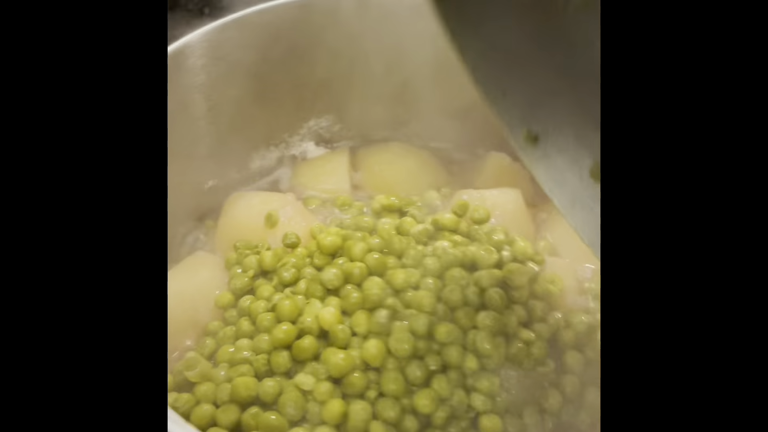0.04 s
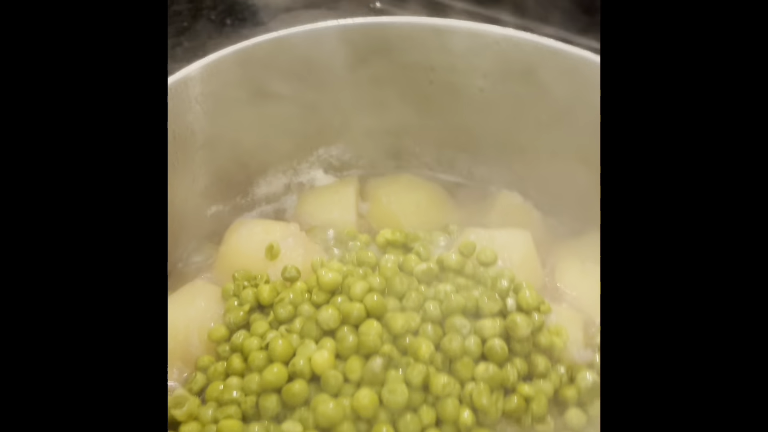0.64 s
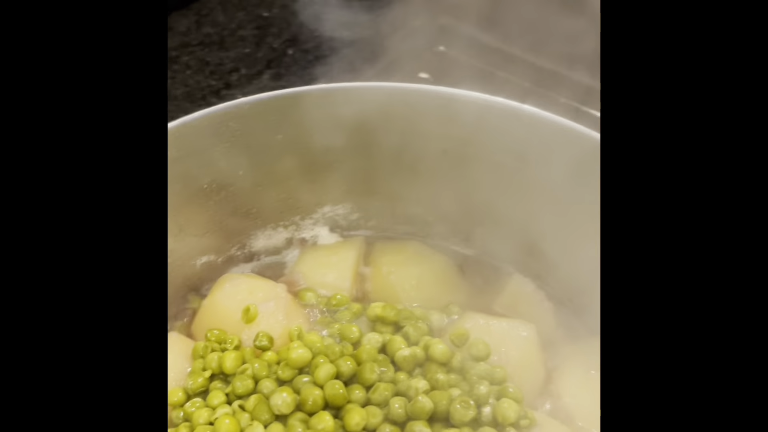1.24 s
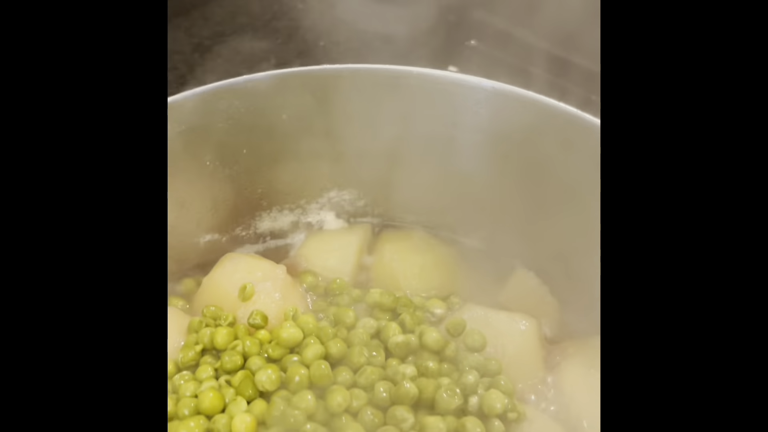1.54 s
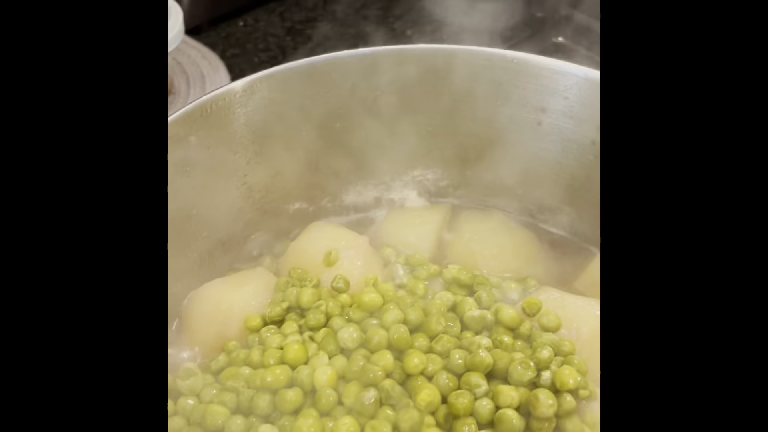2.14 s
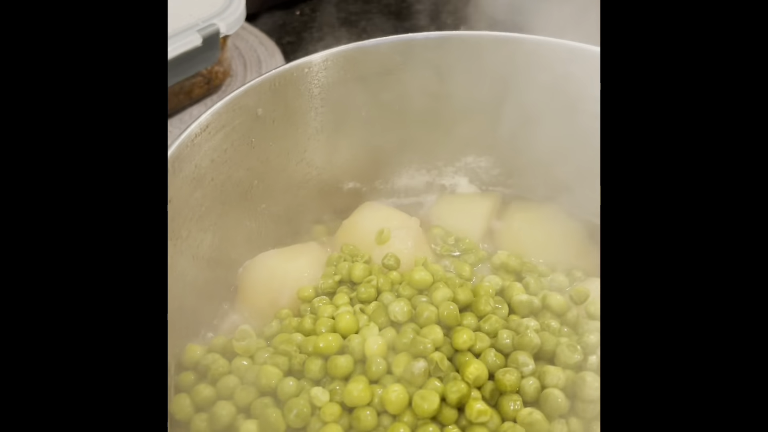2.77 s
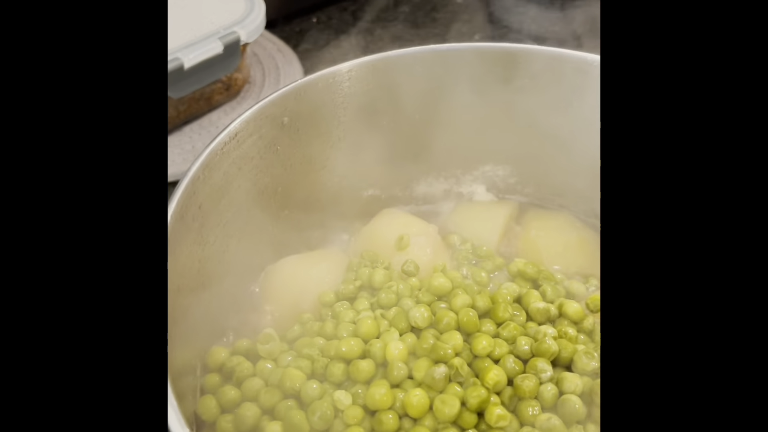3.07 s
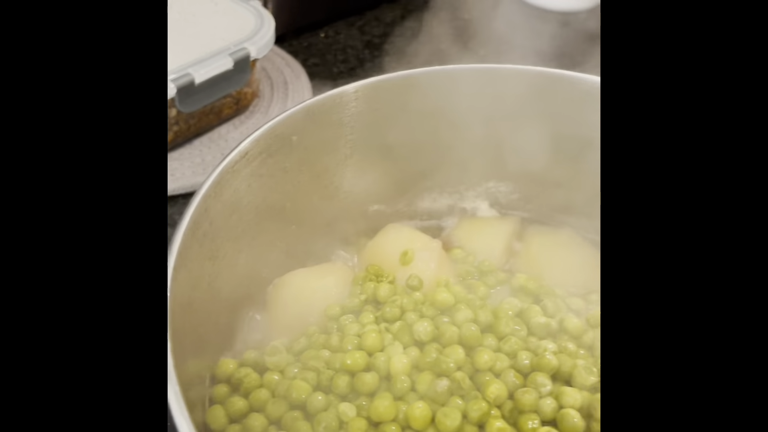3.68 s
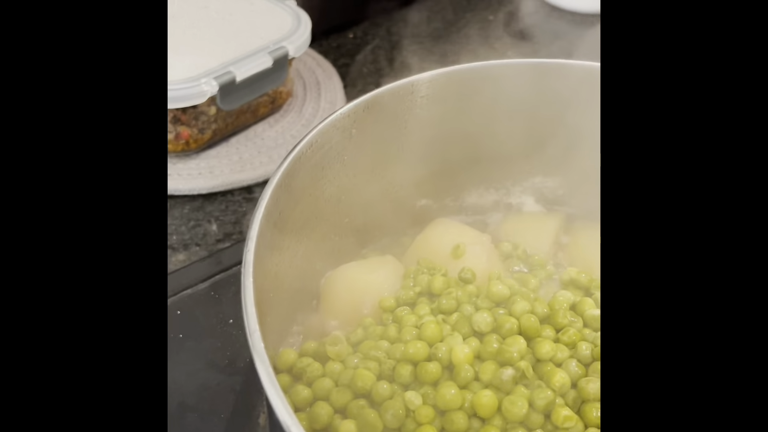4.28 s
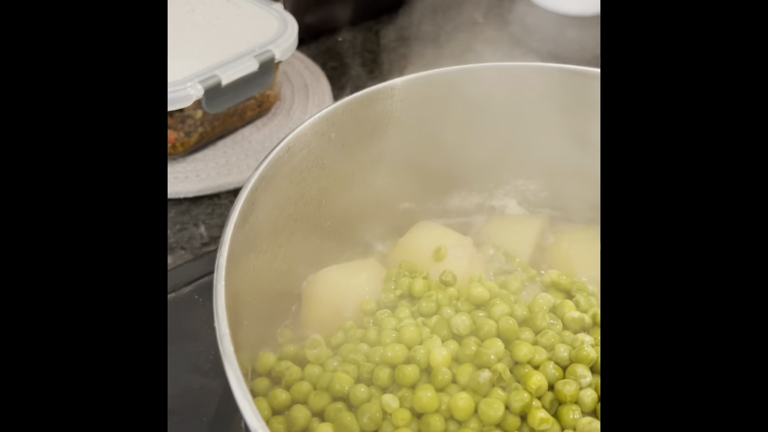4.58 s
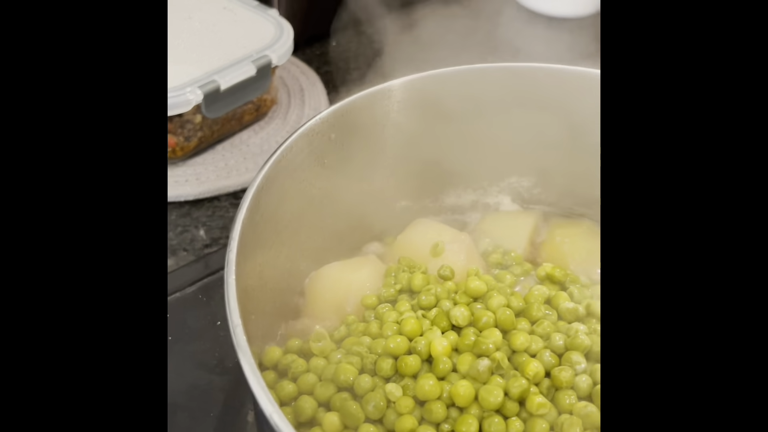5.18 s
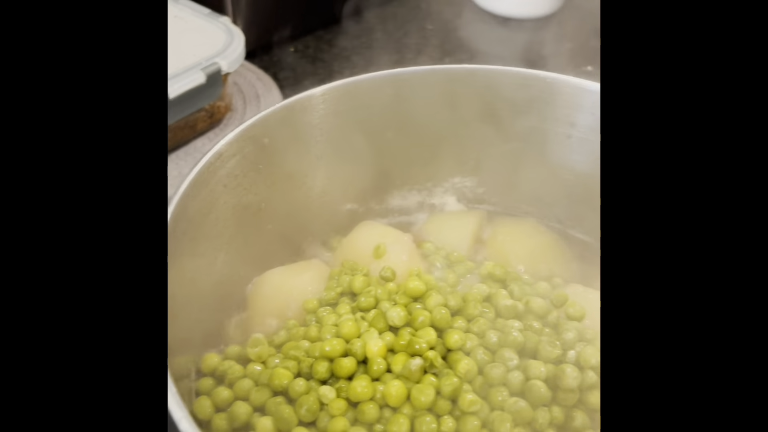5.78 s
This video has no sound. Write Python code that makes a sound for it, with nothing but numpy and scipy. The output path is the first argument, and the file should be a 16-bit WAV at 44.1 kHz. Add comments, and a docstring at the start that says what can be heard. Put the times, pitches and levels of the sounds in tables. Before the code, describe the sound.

Water boils throughout in a steel pot of peas and potatoes, heard very close in a kitchen with little echo. The steady layer is a fine, crackling fizz with small bubbles over a low, uneven rumble, and the fizz grows slightly stronger after about 1.4 seconds. Droplets tick sharply on the hot metal here and there. Steam pockets burst through the food as short, hollow, falling plops with small splashes, first in the opening half second and again from 1 to 1.4 seconds. A sharper bubble pop follows at about 1.5 seconds. From 2 to 3.4 seconds there are mostly light blips and high ticks. The plops return more often from 3.7 to 4.9 seconds. Around 5.4 seconds a few more come with a faint knock of food against the steel wall, and the boiling continues to the end, just before 6 seconds.

```python
"""Peas and potatoes on the boil

A little water boils in a steel pot, close to a pair of microphone ports. Over a low rumble, tiny bubbles
fizz and tick on the hot metal and small ones blip between the peas. Now and then a pocket of steam bursts
through the food with a falling plop and a splash. The pot's hollow, its wall and the kitchen answer."""
import sys
import numpy as np
from scipy import signal
from scipy.fft import rfft, irfft, next_fast_len
from scipy.io import wavfile
from scipy.ndimage import map_coordinates

SR = 44100
rng = np.random.default_rng(int(sys.argv[2]) if len(sys.argv) > 2 else 0)


def transcribe(u):
    """Save the signal u as a 16-bit wav file named by the first command-line argument.

    u: samples, shape (n,) or (channels, n), limited to [-1, 1]; the rate is SR.
    q: integer samples, one column per channel.
    """
    v = np.clip(np.atleast_2d(u).T, -1, 1)
    q = np.round(v * 32767).astype(np.int16)
    wavfile.write(sys.argv[1], SR, q)


N = 256662

# EQ curves of the boiling bed: (frequency [Hz], relative level [dB])
RUMBLE_EQ = [(20, -31), (35, -11), (52, -1.5), (75, 1.5), (100, -5), (135, 3), (180, -3), (260, 1),
             (500, -9), (1200, -49)]
DIFFUSE_EQ = [(100, -18), (200, -9), (500, -2.5), (1100, -1), (1700, -13), (2700, -2), (4300, 1),
              (6000, -1), (9000, -22), (11000, -0.5), (13000, -13), (16000, -50)]
SIMMER_EQ = [(100, -32), (250, 3.5), (520, 3), (780, -3.5), (1100, -1.5), (1500, -3.5), (3000, -6.5),
             (4500, -10), (8000, -37)]
FIZZ_EQ = [(1000, -30), (2500, -12), (4300, -10.5), (5800, -4), (7000, -3.5), (9000, -3.5), (10900, 1.5),
           (12000, -6), (14000, -28.5), (16000, -58)]
# fader rides of the bed: (time [s], relative level [dB])
SIMMER_RIDE = [(0, -40), (1, -39), (2.4, -39), (2.9, -39.5), (3.02, -37.5), (3.15, -41), (3.4, -39.5),
               (3.9, -41), (5.82, -38)]
FIZZ_RIDE = [(0, -34.5), (.25, -39.5), (.48, -34.5), (1.1, -34), (1.4, -32.5), (3.8, -32.5), (5.82, -31.5)]

# food bumping the wall: (time [s], relative level [dB], height on the wall [0-1])
KNOCK_CUES = [(5.43, -23, 1), (5.4527, -14.5, 0), (5.472, -22, .5)]
# the steel's ring: (frequency [Hz], gain struck low [dB], gain struck high [dB], t60 [s])
STEEL_MODES = [(774, -3.5, -16, 0.029), (1853, -3.5, -18, .027), (3375, -8.5, 0, 0.032),
               (5430, -1, -15, 0.021), (6600, -21, -9, .025)]
# droplets snapping on hot steel: (time [s], relative level [dB], pitch [Hz])
TICK_CUES = [(0.1545, -4, 7300), (0.165, 1, 11200), (0.4223, -7.5, 12200), (0.6119, -9, 11000),
             (0.8955, -9.5, 12300), (0.9133, -10, 11500), (1.3193, -11, 7200), (1.3772, -4.5, 10800),
             (1.4365, -9, 7600), (1.501, -18, 7040), (1.5805, -15, 6600), (1.7074, -10, 7100),
             (1.743, -6.5, 11000), (1.9828, -3, 11600), (2.1035, -4, 11300), (2.1664, -5, 10900),
             (2.3031, -2.5, 6700), (2.315, -6, 10900), (2.4243, -1.5, 11600), (2.4851, -9, 10500),
             (2.6822, -4, 6060), (2.779, -3.5, 6700), (3.0509, -1, 6900), (3.1591, -10, 11800),
             (3.1915, -6, 5740), (3.3522, -3.5, 10800), (3.8879, -1, 10900), (4.112, -9, 10500),
             (5.416, -11, 6470), (5.6973, -3, 6900), (5.7846, -7, 10900)]
# featured bubbles, dry pops to ringing blips: (time [s], relative level [dB], pitch [Hz], t60 [cycles])
BLIP_CUES = [(0.1545, -8, 1562, 61), (0.2364, -22, 1580, 38), (0.263, -26, 1730, 45),
             (0.6075, -28.5, 1130, 44), (0.755, -27, 1550, 37), (0.994, -31, 1180, 44),
             (1.233, -29, 1030, 44), (1.5374, -4, 1730, 6.4), (1.5428, -6, 3600, 11),
             (1.877, -28.5, 1076, 37), (2.124, -26, 1640, 20), (2.153, -26, 1900, 16),
             (2.343, -24, 1700, 12), (2.3573, -20, 2720, 19), (2.413, -26, 1700, 16),
             (2.4238, -22, 2600, 7.3), (2.4545, -24, 1100, 14), (2.459, -29, 2000, 14),
             (2.6826, -18.5, 3060, 20), (2.7762, -15, 3170, 19), (3.036, -17.5, 2300, 9),
             (3.0508, -19, 2800, 8.8), (3.062, -25, 1090, 12), (3.3485, -21, 3230, 11),
             (3.362, -24, 1070, 18), (3.364, -24, 2600, 20), (5.359, -27, 1050, 44),
             (5.6979, -23, 3240, 22)]
# bursting steam pockets: (time [s], relative pocket level [dB], depth under the food [0-1],
# landing pitch [Hz], fall time constant [s], thump delay [s], relative water level [dB],
# share of mist [0-1], splash t60 [s])
PLOP_CUES = [(0.001, -25, 1, 144, 0.0024, 0, -57, 0.2, .027),
             (0.138, -27, 0.8, 154, 0.0028, .003, -16, 0.54, .019),
             (0.1544, -37, 0.87, 410, 0.0015, 0, -21.5, 0.4, 0.028),
             (0.1646, -19, 0.72, 200, 0.0032, .005, -26, 0.7, 0.014),
             (0.267, -27.5, 0.8, 121, 0.00265, 0, -58, .6, .03),
             (0.467, -28.5, 0.7, 131, 0.0027, 0.00035, -54, .9, .03),
             (1.049, -25.5, 0.76, 190, .003, 0.0051, -26, 0.31, 0.044),
             (1.127, -18, 0.33, 284, .0026, 0.0071, -18.5, 0.17, 0.024),
             (1.156, -32, .2, 425, 0.0022, 0.00086, -39, .2, .025),
             (1.334, -15, 0.3, 331.6, .003, 0.014, -21.5, 0.23, 0.024),
             (1.391, -30, 0.34, 444, .001, 0.0075, -42, .3, .02),
             (1.543, -40, 0, 290, 0.0043, 0.021, -26, 0.53, 0.0099),
             (1.583, -32.5, .15, 284, 0.0051, 0.0042, -44, 0.4, .02),
             (2.992, -42, 0.04, 380, .004, 0.0118, -41, 0.26, 0.047),
             (3.036, -50, 0, 406, .0026, 0.014, -29, 0.26, 0.019),
             (3.705, -31, .13, 393, 0.0041, 0.015, -28, 0.5, 0.017),
             (3.721, -30, 0.16, 330, 0.0026, 0.019, -38, .4, .02),
             (3.735, -31, 0.4, 260, 0.0032, 0, -34, 0.8, 0.025),
             (3.7512, -19.5, 0.05, 324, 0.0021, 0.025, -29, 0.14, 0.026),
             (3.982, -25.5, 0.15, 292, .003, 0.0051, -24.5, 0.78, 0.04),
             (3.999, -26.5, 0.13, 263, 0.0029, 0.0016, -35, 0.3, .02),
             (4.0257, -19.5, 0.21, 272, 0.00193, 0.0059, -16.5, 0.3, 0.013),
             (4.239, -23.5, 0.35, 256, .0026, 0.027, -21, 0.81, 0.034),
             (4.294, -26, 0, 345, 0.0027, 0.015, -25, .57, 0.039),
             (4.551, -24.5, 0.44, 350, 0.0044, 0.021, -20, 0.7, 0.024),
             (4.632, -21, .6, 136, .0045, 0.0096, -28.5, 0.87, 0.021),
             (4.7395, -28, 0.23, 405, .0045, 0.034, -23, 0.86, 0.028),
             (4.868, -25, .05, 460, 0.0032, 0.015, -23, 0.79, 0.03),
             (4.9193, -23, 0.4, 231, 0.0021, 0, -22.5, 0.17, 0.017),
             (5.4249, -31, .2, 690, 0.00096, 0.017, -30, .3, 0.014),
             (5.429, -28, 0.5, 302, 0.0031, 0.0027, -24, 0.84, .045),
             (5.4525, -24.5, 0.46, 443, 0.0027, 0.015, -21.5, 0.44, 0.019)]
# EQ curves of the noise in ticks, blips and plops: (frequency [Hz], relative level [dB])
SPUTTER_EQ = [(1000, -20), (3000, -6), (6000, 3), (9000, 12), (11000, 12.5), (12500, -0.5), (14000, -34),
              (16000, -32)]
GURGLE_EQ = [(70, -14.5), (130, 0.5), (250, 6.5), (480, 7), (750, 2), (1100, -4), (2500, -33)]
PUSH_EQ = [(20, -42), (45, 0), (80, 2), (120, -5), (250, -30), (800, -47)]
SPLASH_EQ = [(150, -19), (450, -1), (1000, -1), (1500, 0.5), (2400, -1.5), (3400, -2), (4500, -10),
             (8000, -7), (14000, -45)]
SPRAY_EQ = [(1000, -48), (2500, -9), (4300, -12.5), (5800, -3.5), (8000, -3), (9000, 1), (10500, 4.5),
            (11500, 1.5), (12200, -6.5), (14000, -21), (16000, -45)]
SPATTER_EQ = [(300, 2), (900, -2), (2000, 0.5), (3700, -3.5), (5500, -4.5), (11000, 0), (14000, -24)]

# resonances of the pot: its air hollow up to about 1.2 kHz, its steel wall above: (frequency [Hz], width [Hz],
# gain [dB])
POT_MODES = [(139.7, 16, 9.5), (259, 21, 10), (332.4, 14.5, 6.5), (383.8, 18.4, 8), (491, 70, 7.5),
             (766, 14, 5), (855, 60, 4.5), (992, 57, 7.5), (1140, 230, 3), (1530, 32, -1),
             (2180, 63, 6.5), (3194, 68, 5.5)]
# reverb returns of the pot wall and the kitchen: (frequency [Hz], gain [dB])
WALL_EQ = [(100, -30), (400, -24.5), (850, -15.5), (1700, -16), (2700, -5.5), (4300, 2.5), (6000, -6.5),
           (9000, -43), (13000, -9)]
KITCHEN_EQ = [(60, -50), (200, -31), (500, -17), (3000, -9.5), (8000, -41)]
# the kitchen's decay: (frequency [Hz], t60 [s])
KITCHEN_DECAY = [(120, 0.24), (1000, 0.023), (4000, 0.13), (12000, 0.056)]
# stereo phase of the direct sound: (frequency [Hz], left's lead over right [rad])
STEREO_PHASE = [(100, 0), (400, -.4), (800, -1.1), (1300, -.6), (1800, 0), (2800, 1.3), (3900, .4),
                (4850, 3.2), (5700, 6.1), (6200, 6.4), (9100, 9.4), (12200, 12.5), (13700, 12.7),
                (15500, 15.7)]
# stereo balance: (frequency [Hz], left minus right [dB])
STEREO_TILT = [(60, 0), (200, -2), (400, -3.5), (750, -5.5), (1300, -2.5), (2400, 0.5), (5000, -0.5)]


def amp(db):
    """Decibels to gain."""
    return 10 ** (np.asarray(db) / 20)


def unit(x):
    """x at rms 1."""
    return x / np.sqrt(np.mean(x ** 2) + 1e-20)


def along(points, hz):
    """(Hz, value) points read on a log axis."""
    f, v = np.transpose(points)
    return np.interp(np.log(hz + 1), np.log(f), v)


def wobble(rate):
    """A smooth random curve with rate knots a second."""
    return map_coordinates(rng.standard_normal(int(N * rate / SR) + 4), [np.arange(N) * rate / SR])


def filtered(x, response):
    """x through a complex frequency response."""
    size = next_fast_len(x.shape[-1] + SR // 2)
    return irfft(rfft(x, size) * response(np.fft.rfftfreq(size, 1 / SR)), size)[..., :x.shape[-1]]


def coloured(x, eq, size=4096):
    """x through a minimum-phase filter of energy 1, shaped like the EQ curve."""
    cepstrum = irfft(np.log(amp(along(eq, np.fft.rfftfreq(size, 1 / SR)))))
    cepstrum[1:size // 2] *= 2
    cepstrum[size // 2 + 1:] = 0
    kernel = irfft(np.exp(rfft(cepstrum)))
    return signal.fftconvolve(x, kernel / np.linalg.norm(kernel))[:len(x)]


def envelope(t, rise, t60):
    """An attack and decay of height 1; times in seconds."""
    shape = (1 - np.exp(-t / rise)) * np.exp(-np.log(1000) * t / t60)
    return shape / shape.max(axis=-1, keepdims=True)


def add(track, s, sound):
    """Mix a sound into a track at time s."""
    start = max(round(s * SR), 0)
    track[start:start + len(sound)] += sound[:len(track) - start]


def random_cues(count):
    """Rows of a random time in seconds and two normal deviates."""
    return np.column_stack([rng.random(count) * N / SR, rng.standard_normal((count, 2))])


def crackle(rate, spread_db):
    """Random impulses of rms 1, most small and a few large."""
    chance, size = rng.random(N), np.clip(rng.standard_normal(N), -2, 2.6)
    return unit((chance < rate / SR) * amp(spread_db * size) * rng.choice([-1, 1], N))


def bubbles(low_hz, high_hz, cycles, spread_db, count):
    """A stream of small bubbles, each a short damped sine; rms 1."""
    when, pitch, life, size = rng.random((count, 4)).T[:, :, None]
    t = np.arange(SR // 40) / SR
    hz = low_hz * (high_hz / low_hz) ** pitch
    ring = np.sin(2 * np.pi * hz * t) * envelope(t, .5 / hz, cycles * (.5 + life) / hz)
    gain = amp(spread_db * np.minimum(-np.log(size), 4)) * hz / low_hz
    slots = (when * N).astype(int) + np.arange(len(t))
    return unit(np.bincount(slots.ravel(), (gain * ring).ravel(), N)[:N])


def reflections(x, t60s, eq, delay_s, patterns):
    """Diffuse echoes at each port; one pattern fades into the next as steam and microphone drift."""
    out, step = np.zeros((2, N)), N // patterns
    for centre in range(0, N, step):
        hz, t, noise = signal.stft(rng.standard_normal((2, SR // 3)), SR, nperseg=128)
        decay = np.exp(-np.log(1000) * t / along(t60s, hz)[:, None])
        tails = signal.istft(noise * decay, SR, nperseg=128)[1]
        span = np.arange(max(centre - step, 0), min(centre + step, N))
        piece = x[span] * np.cos(np.pi / 2 * (span - centre) / step)
        for port, tail in zip(out, tails):
            add(port, span[0] / SR + delay_s, signal.fftconvolve(piece, tail / np.linalg.norm(tail)))
    return filtered(out, lambda hz: amp(along(eq, hz)))


def pot_resonance(x):
    """The air in the pot resonates and lifts a few low notes; the steel wall colours a few higher ones."""
    return filtered(x, lambda f: 1 + sum(
        (amp(db) - 1) * 1j * f * width / (hz * hz - f * f + 1j * f * width)
        for hz, width, db in POT_MODES))


def churn():
    """The water rolls with a low, uneven rumble."""
    return amp(-45.5 + 2.5 * wobble(11)) * unit(coloured(rng.standard_normal(N), RUMBLE_EQ))


def diffuse_boil(level_db):
    """Boiling from all round the pot reaches each port off the walls as its own fine crackle."""
    ports = [unit(coloured(crackle(rate=5000, spread_db=5.5), DIFFUSE_EQ)) for port in range(2)]
    return amp(level_db - 10) * np.array(ports)


def simmer(level_db):
    """Water bubbles between the peas: near bubbles ring over a wash of far ones."""
    stream = bubbles(low_hz=405, high_hz=4320, cycles=11.6, spread_db=2.5, count=4200)
    wash = rng.standard_normal(N)
    flutter = amp(1.5 * wobble(18))
    return amp(level_db - 0.45) * unit(coloured((stream + wash) * flutter, SIMMER_EQ))


def fizz(level_db):
    """Tiny bubbles snap on the hot steel in quick flurries; some spit, each at its own pitch."""
    snaps = crackle(rate=1700, spread_db=7) + amp(-1) * rng.standard_normal(N)
    flurry = amp(0.39 * wobble(23) + 1.62 * wobble(90))
    spits = bubbles(low_hz=6390, high_hz=11840, cycles=41, spread_db=4, count=900)
    return amp(level_db) * (unit(coloured(snaps * flurry, FIZZ_EQ)) + amp(-5.5) * spits)


def knocks():
    """Jostled food bumps the steel wall; the height of the blow sets the mix of ringing modes."""
    track, t = np.zeros(N), np.arange(SR // 12) / SR
    for s, db, height in KNOCK_CUES:
        ring = np.zeros(len(t))
        for hz, low_db, high_db, t60 in STEEL_MODES:
            gain = amp(low_db + height * (high_db - low_db))
            ring += gain * np.sin(2 * np.pi * hz * t) * envelope(t, 0.0043, t60)
        add(track, s, amp(db) * ring)
    return track


def ticks(ring_cycles=10.6, sputter_db=1.5):
    """Single droplets flash to steam: a very high ping with a short sputter."""
    track, t = np.zeros(N), np.arange(SR // 60) / SR
    faint_cues = [(s, -28 + 8 * size, 9000 * 2 ** (0.24 * np.tanh(pitch)))
                  for s, size, pitch in random_cues(9)]
    for s, db, hz in list(TICK_CUES) + faint_cues:
        ping = np.sin(2 * np.pi * hz * t) * envelope(t, 0.00015, ring_cycles / hz)
        flash = envelope(t, 0.00044, 0.006) + amp(-8) * envelope(t, 0.00055, 0.0086)
        sputter = coloured(flash * rng.choice([-1, 1], len(t)), SPUTTER_EQ)
        sputter *= amp(sputter_db) / np.abs(sputter).max()
        add(track, s + 0.00047, amp(db - 8) * (ping + sputter))
    return track


def blips(wander_rad=0.34):
    """Larger bubbles open at the surface and ring with a wet edge and a wandering phase."""
    track, t = np.zeros(N), np.arange(SR // 16) / SR
    faint_cues = [(s, -27.5 + 0.97 * size, 1477 * 2 ** (0.397 * pitch), 44)
                  for s, size, pitch in random_cues(7)]
    for s, db, hz, cycles in list(BLIP_CUES) + faint_cues:
        t60 = cycles / hz
        overtone = amp(3 + 0.85 * db)  # gain from one harmonic to the next: louder is brighter
        wander = wander_rad * np.cumsum(rng.standard_normal(len(t))) * np.sqrt(hz / SR)
        phase = 2 * np.pi * hz * t + wander
        ring = sum(overtone ** (k - 1) * np.sin(k * phase) * envelope(t, 0.093 * t60 / k, t60 / k**0.61)
                   for k in (1, 2, 3))
        wet = amp(-10.5) * coloured(rng.standard_normal(len(t)), SPLASH_EQ) * envelope(t, 0.0013, 2.5*t60)
        add(track, s, amp(db - 3.5) * (ring + wet))
    return track


def thrown_water(t, depth, mist, splash_t60):
    """A burst throws water: coarse drops splash, fine mist hisses, and some sizzles on the wall."""
    def drops(eq):
        grains = rng.standard_normal(len(t)) * amp(5.3 * rng.standard_normal(len(t)))
        return coloured(unit(grains), eq)

    slap = envelope(t, 0.031 * splash_t60, splash_t60) + amp(-13.5) * envelope(t, 0.0042, 0.12)
    splash = coloured(rng.standard_normal(len(t)), SPLASH_EQ) * slap
    spray = drops(SPRAY_EQ) * envelope(t, 0.039 * splash_t60, 2.78 * splash_t60)
    spatter = drops(SPATTER_EQ) * envelope(t, 0.084, 0.27) * (1 - np.exp(-t / 0.014))
    return (amp(6 - 14.5 * mist) * splash + amp(-1 + 11.5 * mist) * spray
            + amp(-6.5 - 28.5 * depth) * spatter)  # little from deep down reaches the wall


def plops():
    """A steam pocket tears open: its note plunges as the cavity widens, then the hollow thumps."""
    track, t = np.zeros(N), np.arange(SR // 4) / SR
    tone = lambda hz: np.sin(2 * np.pi * (np.cumsum(hz) / SR + rng.random()))
    noise = lambda eq: coloured(rng.standard_normal(len(t)), eq)
    for s, pocket_db, depth, landing_hz, fall, thump_delay, water_db, mist, splash_t60 in PLOP_CUES:
        thump_hz = 139 * np.exp(0.025 * rng.standard_normal()) + 100 * np.exp(-t / 0.004)
        note_hz = landing_hz + 1000 * np.exp(-t / fall) + 220 * np.exp(-t / (3 * fall))
        ragged = np.exp(0.25 * noise(GURGLE_EQ))  # the torn rim makes the note unsteady
        gulp = tone(note_hz * ragged) * envelope(t, 0.0025, 0.069)
        gurgle = amp(-9.5) * noise(GURGLE_EQ) * envelope(t, 0.0021, 0.2)
        thump = tone(thump_hz) * envelope(t, 0.007, 0.054)
        air_push = noise(PUSH_EQ) * envelope(t, 0.0032, 0.21)
        water = thrown_water(t, depth, mist, splash_t60)
        # a shallow pocket rings openly; a deep one shoves air out of the pot and heaves the food
        pocket = amp(3 - 8.5 * depth) * (gulp + gurgle) + amp(-29 + 28 * depth) * air_push
        add(track, s, amp(pocket_db) * pocket + amp(water_db) * water)
        add(track, s + thump_delay, amp(pocket_db - 11 + 14 * depth) * thump)
    return track


def scene():
    """The stereo mix: direct sound, diffuse crackle, the steel wall's scatter and the kitchen."""
    t = np.arange(N) / SR
    fizz_db = np.interp(t, *np.transpose(FIZZ_RIDE))
    simmer_db = np.interp(t, *np.transpose(SIMMER_RIDE))
    bursts = pot_resonance(plops()) + blips() + ticks()
    pot = bursts + simmer(simmer_db) + churn() + fizz(fizz_db) + knocks()
    side = np.array([[.5], [-.5]])  # left and right each take half the phase and tilt
    direct = filtered(pot, lambda hz: np.exp(1j * side * along(STEREO_PHASE, hz)))
    diffuse = diffuse_boil(fizz_db)
    wall = reflections(bursts, t60s=[(200, 0.13), (3000, 0.033), (10000, 0.028)], eq=WALL_EQ,
                       delay_s=.0004, patterns=48)
    kitchen = reflections(pot, KITCHEN_DECAY, KITCHEN_EQ, delay_s=.006, patterns=16)
    return filtered(direct + diffuse + wall + kitchen, lambda hz: amp(side * along(STEREO_TILT, hz)))


def record(dry):
    """Master chain: cut the deep bass, soft-clip the highest peaks and remove the very top."""
    low_cut_hz, ceiling, top_hz = 28, .92, 15900
    thinned = filtered(dry, lambda hz: (1j * hz / (1j * hz + low_cut_hz)) ** 2)
    rounded = thinned / (1 + (thinned / ceiling) ** 8) ** (1 / 8)
    return filtered(rounded, lambda hz: hz < top_hz)


dry = scene()
out = record(dry)
transcribe(out)
```